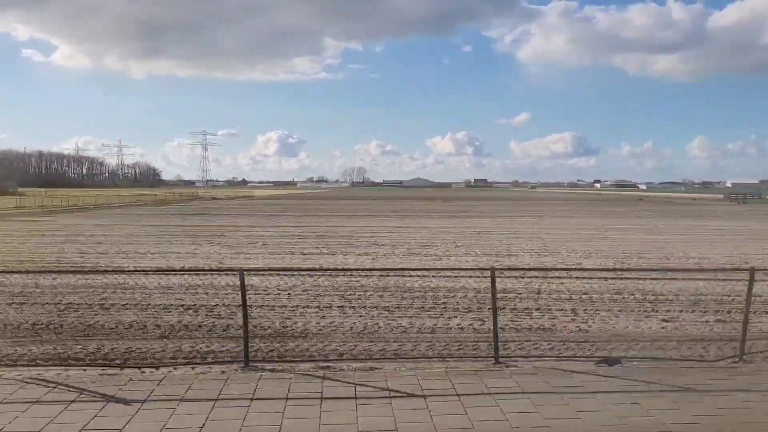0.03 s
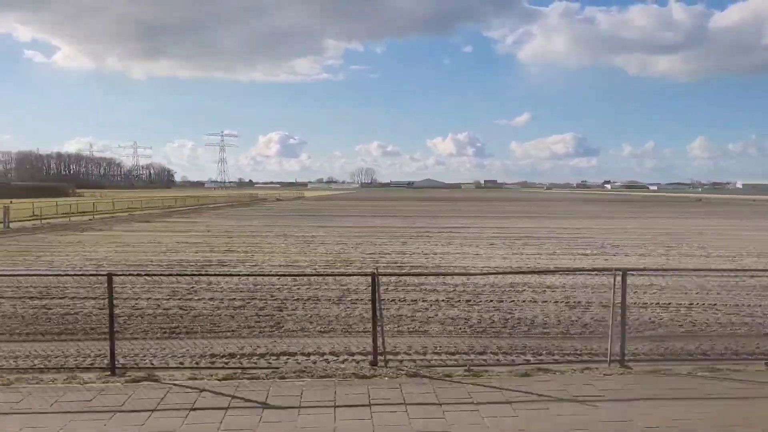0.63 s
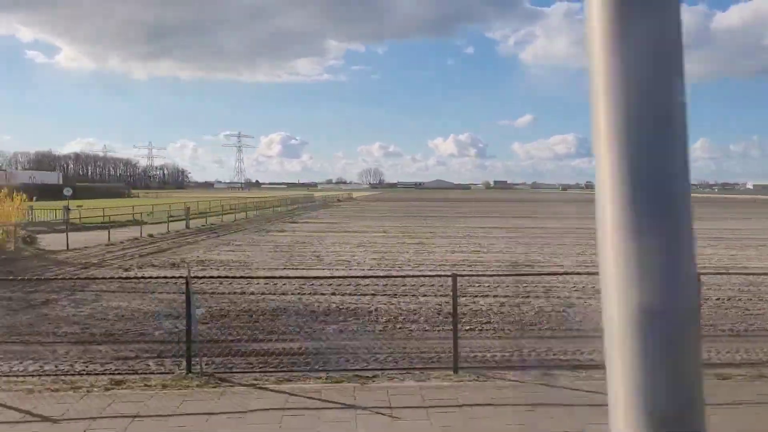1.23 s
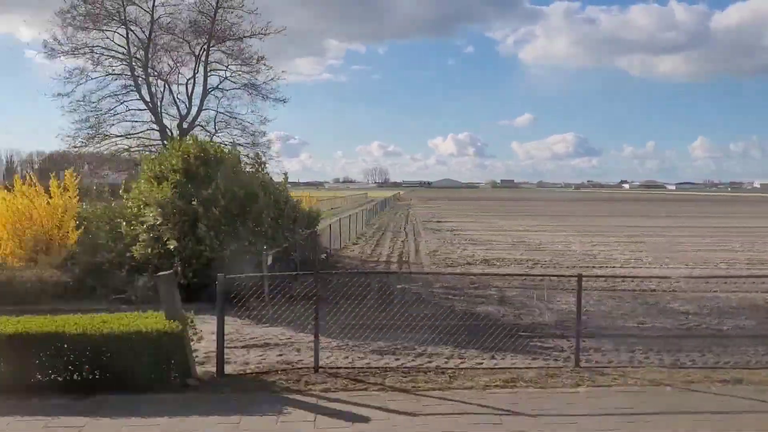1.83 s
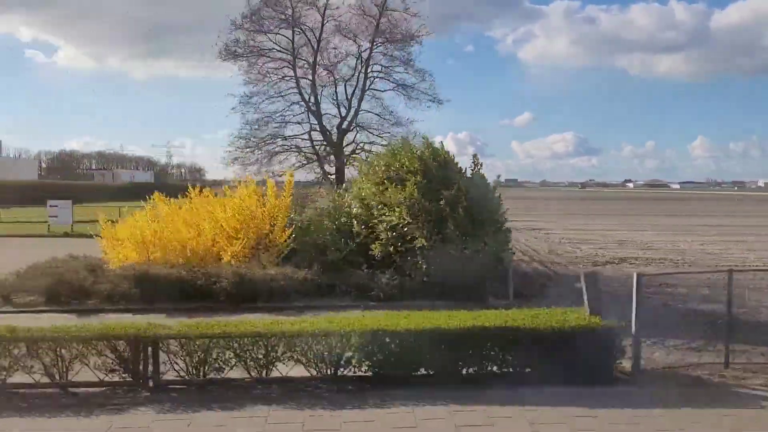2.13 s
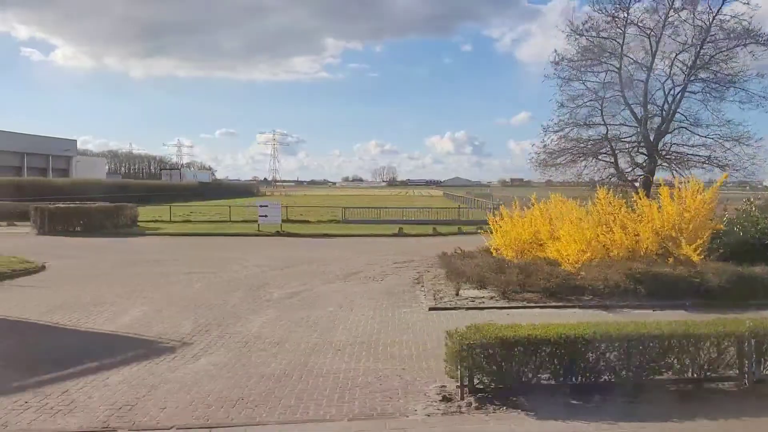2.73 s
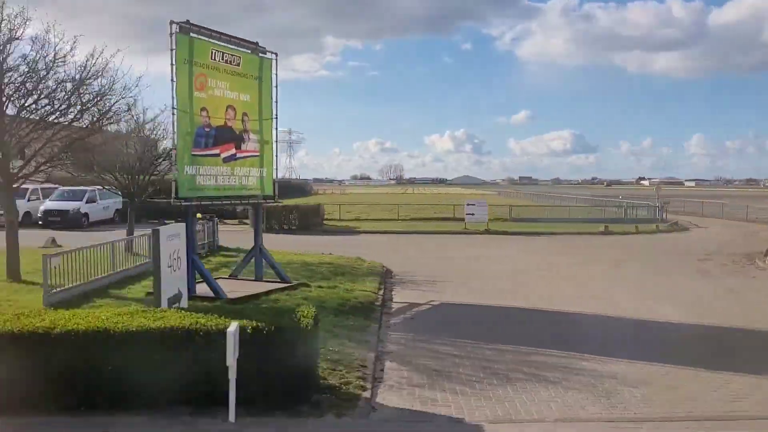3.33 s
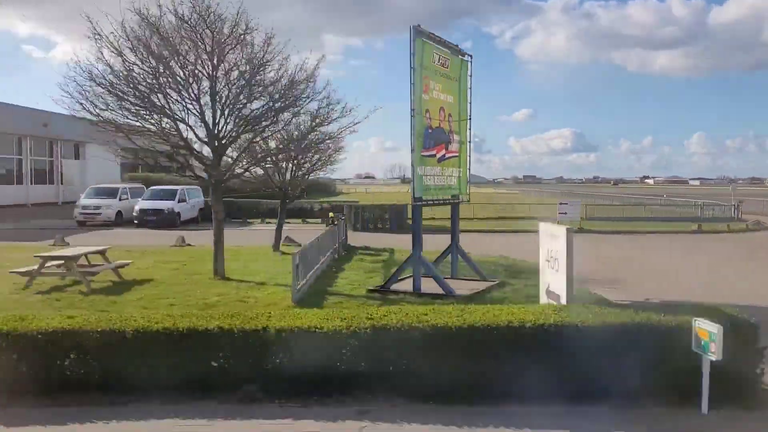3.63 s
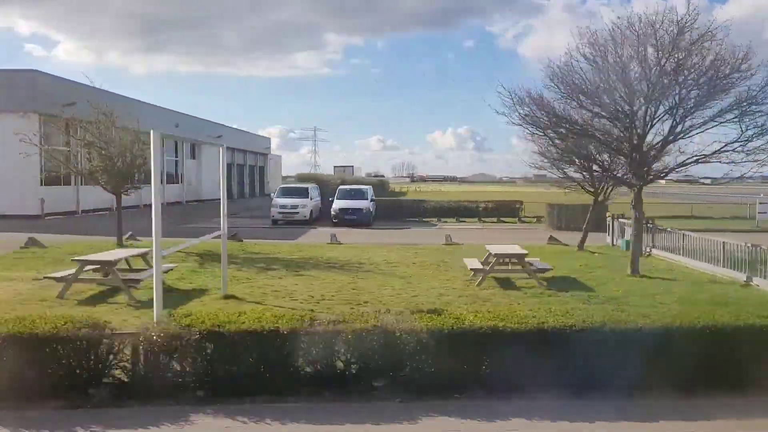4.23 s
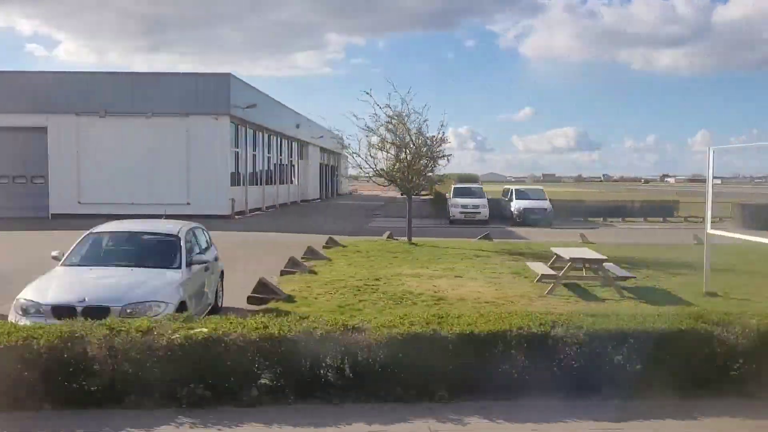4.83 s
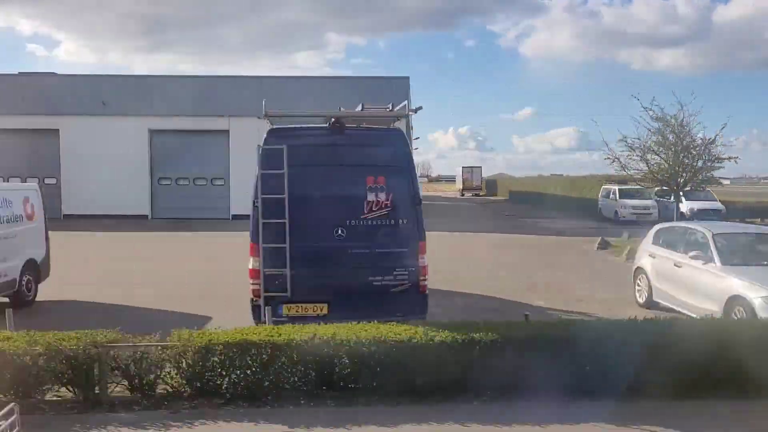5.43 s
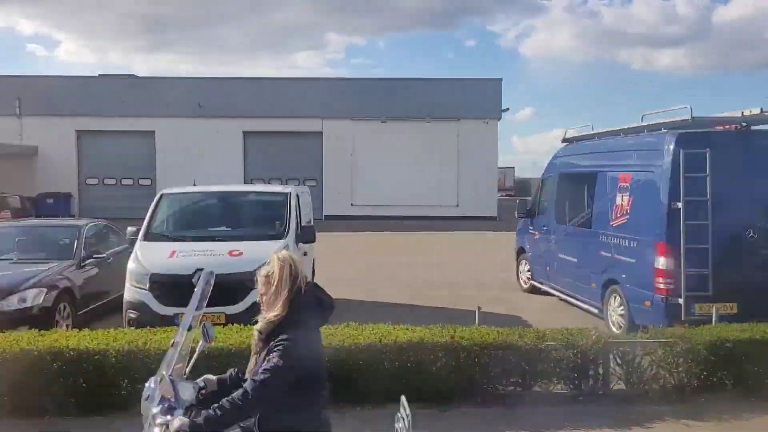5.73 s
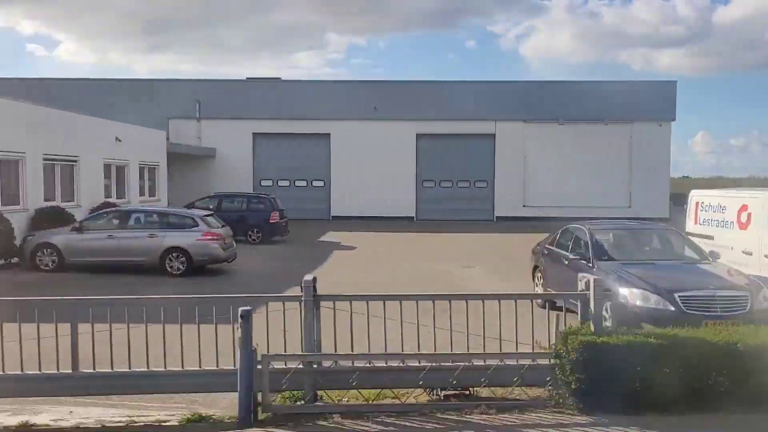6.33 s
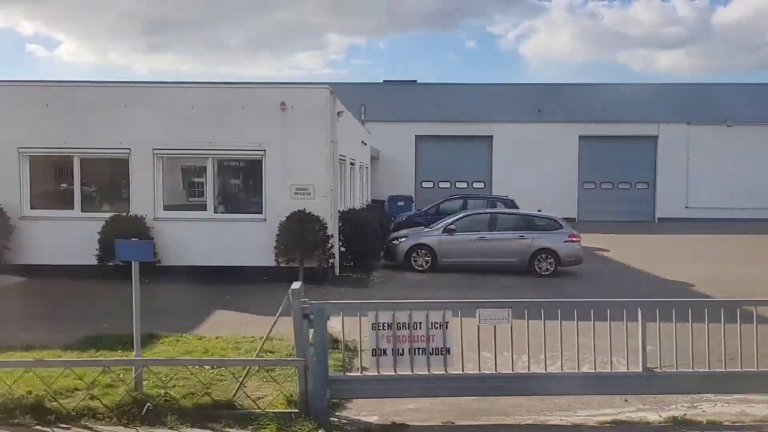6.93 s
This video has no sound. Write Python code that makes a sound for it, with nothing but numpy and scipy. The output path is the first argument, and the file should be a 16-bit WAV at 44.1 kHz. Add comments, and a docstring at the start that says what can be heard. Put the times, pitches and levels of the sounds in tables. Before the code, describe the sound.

Tyres rumble steadily under a moving bus, heard in stereo from a window seat, with a low engine drone and a faint gear whine. Right at the start two bumps rattle a loose panel, the second more softly. A few light plastic clacks and tiny ticks follow, and cloth brushes faintly near the microphone. In the second half the engine takes up load and booms louder through the cabin as the bus slows very slightly.

```python
"""Tyres rumble under a bus on a town road, heard in stereo from a window seat as it slowly loses speed.
The drive shaft hums, the axle gears whine and the air vents whistle faintly. Two early bumps throw a
loose panel against its frame; fittings tick and clack, and cloth brushes close to the microphone.
Halfway the engine takes up load and booms in the cabin."""
import sys
import numpy as np
from scipy import signal
from scipy.fft import irfft, next_fast_len
from scipy.io import wavfile
from scipy.ndimage import uniform_filter1d

SR = 44100
rng = np.random.default_rng(int(sys.argv[2]) if len(sys.argv) > 2 else 0)


def unload_wav(signal):
    """Save mono or channel-first audio to the path in sys.argv[1] as 16-bit WAV at rate SR, clipped to [-1, 1]."""
    wavfile.write(
        sys.argv[1],
        SR,
        np.round(np.clip(np.atleast_2d(signal).T, -1, 1) * 32767).astype(np.int16),
    )


N = 307377
TIME = np.arange(N) / SR
BIN_HZ = np.fft.rfftfreq(next_fast_len(N, True), 1 / SR)


def from_db(db):
    """Decibels to gain."""
    return 10 ** (np.asarray(db) / 20)


def unit_rms(x):
    """Scale to an rms of 1."""
    return x / np.sqrt(np.mean(x ** 2) + 1e-20)


def in_time(curve):
    """A curve's value at every sample."""
    return np.interp(TIME, *np.transpose(curve))


def in_hz(rows, hz):
    """Each column of a spectrum at the given frequencies."""
    points, *columns = np.transpose(rows)
    return [np.interp(np.log(hz + 1e-3), np.log(points), column) for column in columns]


def colour(spectrum):
    """Gain per bin of a smooth spectrum."""
    return from_db(in_hz(spectrum, BIN_HZ)[0])


def drift(rate):
    """Random wavering of rms 1, changing about `rate` times a second."""
    hop, settle = 40, 2000
    pole = np.exp(-2 * np.pi * rate * hop / SR)
    white = rng.standard_normal(N // hop + settle + 2)
    slow = signal.lfilter([1], [1, -2 * pole, pole ** 2], white)[settle:]
    return np.interp(np.arange(N) / hop, np.arange(len(slow)), unit_rms(slow))


def burst(start, rise, t60):
    """Envelope that builds up over `rise` seconds and then dies away."""
    age = TIME - start
    return np.clip(age / rise, 0, 1) * from_db(-60 * np.clip((age - rise) / t60, 0, 3))


def noise(gain, alike, pan_db=0, lead=0):
    """Stereo noise of rms 1 with a gain per bin; the left side leads by `lead` radians."""
    shape = (2, len(BIN_HZ))
    mid, side = rng.standard_normal(shape) + 1j * rng.standard_normal(shape)
    sides = np.array([[1], [-1]])
    pair = np.sqrt(1 + alike) * mid + sides * np.sqrt(1 - alike) * side
    placement = from_db(sides * pan_db / 2) * np.exp(.5j * sides * lead)
    return unit_rms(irfft(pair * gain * placement)[:, :N])


# The cabin's stereo image at the seat. Each row: frequency in Hz, left-right likeness from 0 to 1,
# left minus right in dB, left lead in radians.
SEAT_IMAGE = [(35, 1, -6, 0.78), (75, 0.99, 0, 0.085), (152, 0.99, 0.5, 0.33), (314, 1, -2, 0.65),
              (534, 0.27, -0.5, 0.29), (714, 0.84, 3, 1.1), (862, 0.033, -2, 0.51), (1037, 0.19, 1, 2.87),
              (1420, 0.38, 0.5, 3.4), (1960, .05, -3.5, 3.92), (4200, 0.034, -2, 3.35),
              (5500, 0.042, 1.5, 3.6)]


def cabin_noise(gain, ripple_db=1.54):
    """Noise filling the cabin: alike in the bass, diffuse in the treble, rippled by standing waves."""
    ripple = unit_rms(uniform_filter1d(rng.standard_normal(len(BIN_HZ)), size=200))
    ripple *= np.clip(BIN_HZ / 900, 0, 1) ** 2
    return noise(gain * from_db(ripple_db * ripple), *in_hz(SEAT_IMAGE, BIN_HZ))


def cabin_tone(cycles, hz):
    """A sine near `hz`, placed between left and right by the cabin's standing waves."""
    _, pan_db, lead = in_hz(SEAT_IMAGE, hz)
    sides = np.array([[.5], [-.5]])
    return from_db(sides * pan_db) * np.sin(2 * np.pi * (cycles + rng.random()) + sides * lead)


def resonances(modes):
    """Noise ringing in narrow resonances with steep skirts."""
    peaks = [from_db(db) * unit_rms(1 / (1 + ((BIN_HZ - hz) / (.78 * width)) ** 2))
             for hz, width, db in modes]
    power = np.sum(np.square(peaks), axis=0)
    return np.sqrt(power.mean()) * cabin_noise(np.sqrt(power))


def orders(base_hz, table, flutter_db, wander_cycles):
    """Tones of a turning part, each wavering in level and phase."""
    cycles = np.cumsum(base_hz) / SR
    hum = 0
    for multiple, db in table:
        gain = np.sqrt(2) * from_db(db + flutter_db * drift(4.6))
        phase = multiple * cycles + wander_cycles * drift(11)
        hum += gain * cabin_tone(phase, multiple * base_hz.mean())
    return hum


# Tyres and body, from inside. Each row: frequency in Hz, relative density in dB.
ROAD_SPECTRUM = [(15, -26), (28, -17.5), (40, 3.5), (60, -3), (140, -4), (195, -9.5), (260, -9), (400, -17),
                 (600, -20.5), (880, -22.5), (1250, -30), (2100, -36.5), (3200, -46), (5600, -50.5),
                 (7000, -57), (15800, -86)]
# Cabin and tyre resonances. Each row: frequency in Hz, width in Hz, relative level in dB.
CABIN_MODES = [(47.3, 7, -34.5), (82, 30, -35.5), (162.9, 6, -42), (401.5, 16.6, -43), (491.4, 15.3, -44),
               (722, 35, -39)]
# The steady rush of tyres and air. Each row: time in seconds, gain in dB.
RUSH_LEVEL = [(0, -0.33), (2.5, 0), (4.1, 1.04), (5.1, 0.36), (6, -1.2), (6.97, -1.1)]


def road(rumble_db=-26.5, modes_db=-.4, lump_db=.59):
    """The uneven surface shakes the body and its resonances, all around the microphone."""
    rumble = from_db(rumble_db) * cabin_noise(colour(ROAD_SPECTRUM))
    ringing = from_db(modes_db) * resonances(CABIN_MODES)
    return (rumble + ringing) * from_db(in_time(RUSH_LEVEL) + lump_db * drift(10.5))


# The engine's pace. Each row: time in seconds, firing rate in Hz.
FIRING_RATE = [(0, 46.5), (1.1, 46), (1.5, 44.4), (2.4, 44.1), (3.6, 44.6), (4.6, 45.4), (5.3, 45.3),
               (6, 45), (6.97, 44.4)]
# Its load, heard at the seat as boom. Each row: time in seconds, gain in dB.
ENGINE_LOAD = [(0, -36.5), (1.1, -32), (1.55, -23), (2.6, -30.5), (3.6, -26), (4.6, -27), (5.2, -22),
               (5.7, -17.5), (6.25, -22), (6.6, -18.5), (6.97, -27)]
# Its tones. Each row: multiple of the firing rate, relative level in dB.
ENGINE_TONES = [(1, -23.5), (1.75, -26), (2, -0.5), (3, -18.5), (3.75, -13.5), (4, -20), (5, -24),
                (7.5, -30.5)]


def engine():
    """The firing booms through the cabin, louder under load."""
    firing = orders(in_time(FIRING_RATE), ENGINE_TONES, flutter_db=1.8, wander_cycles=.0077)
    return from_db(in_time(ENGINE_LOAD)) * firing


# The shaft's hum. Each row: multiple of its turning rate, relative level in dB.
SHAFT_TONES = [(2, -6), (3, -3), (4, -13), (5, 0), (10, -18), (10.2, -14)]


def drive_shaft(mesh_hz, meshes_per_turn=7.855, critical_hz=260, width_hz=9.5, gain_db=-30.5):
    """The shaft hums loudest at one road speed, given as gear mesh rate, and fades to either side."""
    near_critical = np.exp(-.5 * ((mesh_hz - critical_hz) / width_hz) ** 2)
    hum = orders(mesh_hz / meshes_per_turn, SHAFT_TONES, flutter_db=.1, wander_cycles=.0043)
    return from_db(gain_db) * near_critical * hum


# The axle's whine. Each row: multiple of the mesh rate, relative level in dB.
GEAR_TONES = [(1, -5), (2, 0), (3, -2.5)]
# Its strength at the seat. Each row: time in seconds, gain in dB.
WHINE_LEVEL = [(0, -51.5), (1.7, -44.5), (2.6, -53), (3.7, -46), (4.3, -41.5), (5.2, -40), (5.55, -45.5),
               (5.9, -38), (6.97, -39.5)]


def axle_gears(mesh_hz):
    """Meshing teeth whine at a pitch that follows the road speed."""
    whine = orders(mesh_hz, GEAR_TONES, flutter_db=1.1, wander_cycles=.012)
    return from_db(in_time(WHINE_LEVEL)) * whine


# Whistles, faint at the seat. Each row: frequency in Hz, width in Hz, relative level in dB.
VENT_WHISTLES = [(3478, 22, -76), (3700, 30, -76), (4012, 60, -66), (4095, 28, -65), (4225, 38, -64),
                 (4431, 32, -71.5), (4645, 38, -75)]


def air_vents(gain_db=3.5):
    """Air whistles through the vents, rising and falling with the rush of the tyres."""
    return from_db(gain_db + in_time(RUSH_LEVEL)) * resonances(VENT_WHISTLES)


# Bumps in the road. Each row: start in seconds, first blow in relative dB, loss per bounce in dB.
ROAD_BUMPS = [(.145, -10.5, 5.5), (0.797, -20.5, 2.7)]


def bounces(count=4, first_gap_s=.0115, gap_growth=1.65):
    """Each bump gives the panel ever weaker, ever wider spaced blows, as pairs of seconds and dB."""
    delays = np.cumsum([0, *(first_gap_s * gap_growth ** np.arange(count - 1))])
    return [(start + delay, db - k * loss_db)
            for start, db, loss_db in ROAD_BUMPS for k, delay in enumerate(delays)]


# The panel's ring. Each row: frequency in Hz, relative level in dB, t60 in seconds.
PANEL_MODES = [(262, 2, .25), (393, -9, .14), (506, -9, .15), (624, -9, .16), (990, -13, .18),
               (1089, -13, .18), (1690, -22, .12), (1925, -17, .16), (2182, -21, .18), (2750, -23, .18)]
# Its clatter across the cabin. Each row: frequency in Hz, relative density in dB.
CLATTER_SPECTRUM = [(100, -12), (260, 2.5), (550, -9.5), (1050, -8), (1400, -18.5), (2000, -20.5),
                    (3000, -31), (4500, -41.5), (8000, -60), (15800, -73)]


def loose_panel(blows, modes_db=-5, clatter_db=-6):
    """The panel strikes its frame; each blow feeds energy to its modes and to a diffuse clatter."""
    clatter_power = sum((from_db(db) * burst(start, rise=.0063, t60=.23)) ** 2 for start, db in blows)
    clatter = from_db(clatter_db) * np.sqrt(clatter_power) * cabin_noise(colour(CLATTER_SPECTRUM))
    energy = np.zeros(N)
    for start, db in blows:
        energy[int(start * SR)] = from_db(db) ** 2
    energy = signal.lfilter(np.hanning(128) / 64, [1], energy)  # a soft contact of 3 ms
    ringing = 0
    for hz, db, t60 in PANEL_MODES:
        retained = from_db(-60 / (t60 * SR)) ** 2
        stored = signal.lfilter([1], [1, -retained], energy + 1e-18)
        ringing += from_db(db + modes_db) * np.sqrt(stored) * cabin_tone(hz * TIME, hz)
    return ringing + clatter


# Tiny ticks, just left of centre. Each row: start in seconds, level in dB, t60 in seconds.
TICK_EVENTS = [(.4778, -52, .02), (1.7245, -52, 0.098), (2.12, -60, .08), (2.522, -56, .08),
               (4.626, -55, .04), (5.566, -54, .11), (5.719, -41, .014), (6.39, -56, .07),
               (6.486, -56, .05)]
# Their bright colour. Each row: frequency in Hz, relative density in dB.
TICK_SPECTRUM = [(3000, -32.5), (6000, -13.5), (9500, -13), (12000, -4), (15800, -10.5)]


def fitting_ticks(faint_per_s=.8, faint_db=-62, faint_t60=.05):
    """Small fittings tick, with fainter ticks scattered at random."""
    faint_starts = TIME[rng.random(N) < faint_per_s / SR]
    ticks = [*TICK_EVENTS, *((start, faint_db, faint_t60) for start in faint_starts)]
    envelope = sum(from_db(db) * burst(start, .001, t60) for start, db, t60 in ticks)
    return envelope * noise(colour(TICK_SPECTRUM), alike=.74, pan_db=1.5)


# Cloth close to the microphone. Each row: peak time in seconds, relative level in dB,
# rise and fall in seconds.
CLOTH_STROKES = [(1.42, -63.5, .68, .26), (2.58, -67.5, .1, 1.15), (4.15, -63.5, 0.63, 0.27),
                 (4.62, -68, 0.43, 0.72), (5.22, -63.5, 0.31, 0.85), (6.55, -69.5, 0.5, 0.76)]
# Its hiss. Each row: frequency in Hz, relative density in dB.
CLOTH_SPECTRUM = [(1000, -14), (2600, 6), (5000, 4), (6800, -0.5), (8100, 4), (9800, -1.5), (11800, 2.5),
                  (15800, -4.5)]


def cloth(gain_db=5.5, grain_db=1.2, rest_db=-74.5):
    """Fibres brush past in soft, grainy swells, with a faint hiss between strokes."""
    swells = [from_db(db) * np.interp(TIME, [peak - rise, peak, peak + fall], [0, 1, 0])
              for peak, db, rise, fall in CLOTH_STROKES]
    rubbing = np.sqrt(from_db(rest_db) ** 2 + np.sum(np.square(swells), axis=0))
    grain = from_db(gain_db + grain_db * drift(90))
    return rubbing * grain * noise(colour(CLOTH_SPECTRUM), alike=.99, pan_db=1.5)


# Fittings near and far. Each row: start in seconds, level in dB, rise and t60 in seconds,
# treble corner in Hz.
CLACK_EVENTS = [(1.357, -38.5, 0.011, 0.33, 8000), (1.635, -42, 0.0088, .2, 2200),
                (3.736, -36.5, .005, 0.24, 16000), (4.005, -44, 0.015, 0.43, 2400),
                (4.025, -37, .002, 0.048, 2400), (4.135, -51, 0.01, 0.23, 16000)]
# Their ring. Each row: frequency in Hz, relative density in dB.
PLASTIC_SPECTRUM = [(500, -0.5), (1400, 0.5), (2250, 0.5), (3300, -8.5), (5000, -7.5), (8000, -13.5),
                    (12000, -11.5), (15800, -9)]


def fitting_clacks(grit_db=1):
    """Plastic parts clack in short rough bursts, duller the farther they are from the microphone."""
    clacks = 0
    for start, db, rise, t60, corner_hz in CLACK_EVENTS:
        dulled = colour(PLASTIC_SPECTRUM) / (1 + (BIN_HZ / corner_hz) ** 4)
        clacks += from_db(db) * burst(start, rise, t60) * noise(dulled, alike=.21)
    return clacks * from_db(grit_db * drift(150))


def scene():
    """Everything that reaches the microphone at a window seat."""
    # Road speed as axle gear mesh rate: a steady slowing, a little stronger at first.
    mesh_hz = 262.8 - 2.75 * TIME + 2.7 * np.exp(-TIME / .9)
    running = road() + engine() + drive_shaft(mesh_hz) + axle_gears(mesh_hz) + air_vents()
    return running + loose_panel(bounces()) + fitting_ticks() + cloth() + fitting_clacks()


def record(dry):
    """The recorder cuts the top steeply."""
    cutoff_hz = 15800
    return signal.sosfilt(signal.ellip(12, .1, 90, cutoff_hz, fs=SR, output="sos"), dry)


dry = scene()
out = record(dry)
unload_wav(out)
```